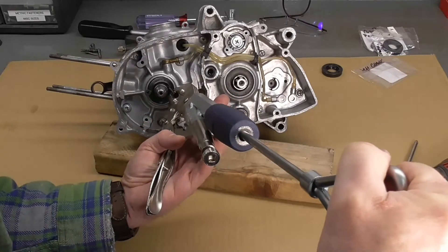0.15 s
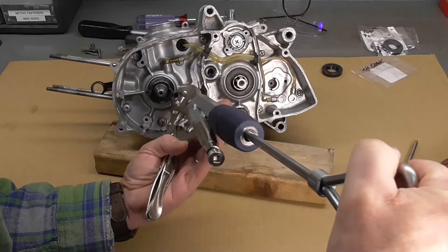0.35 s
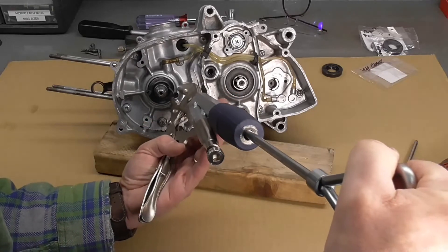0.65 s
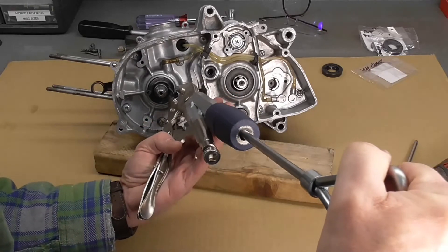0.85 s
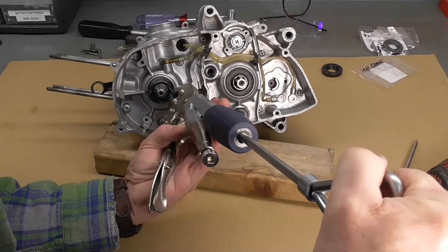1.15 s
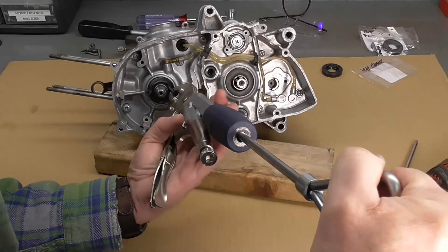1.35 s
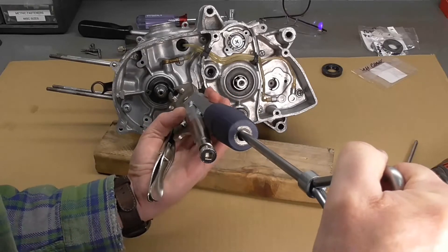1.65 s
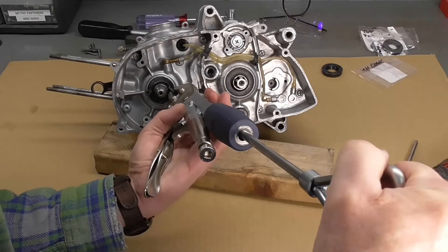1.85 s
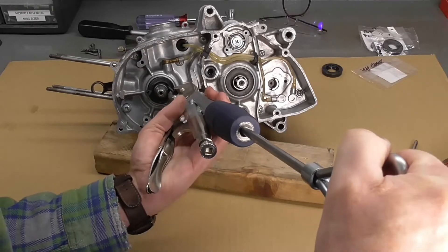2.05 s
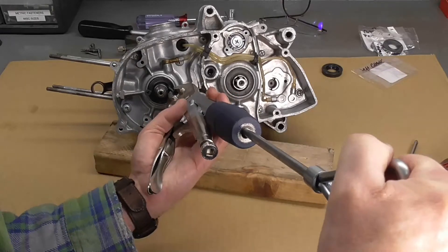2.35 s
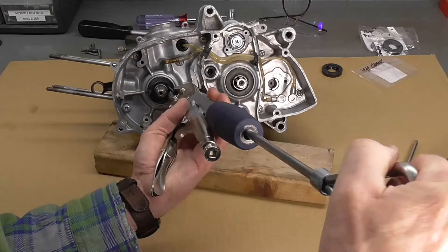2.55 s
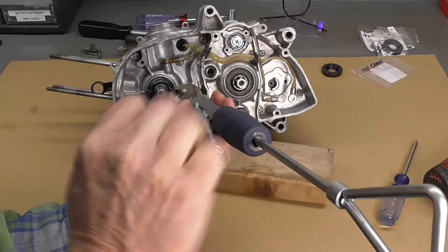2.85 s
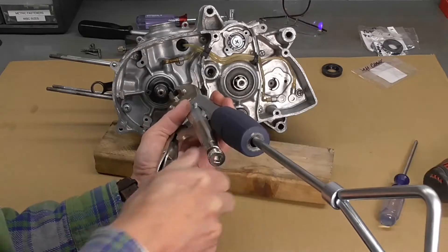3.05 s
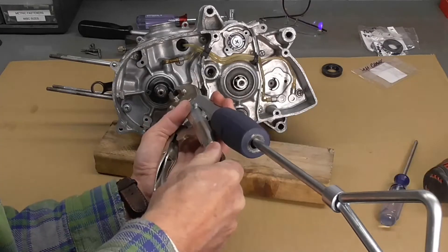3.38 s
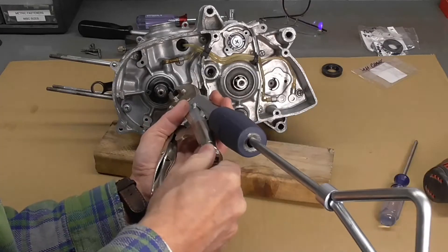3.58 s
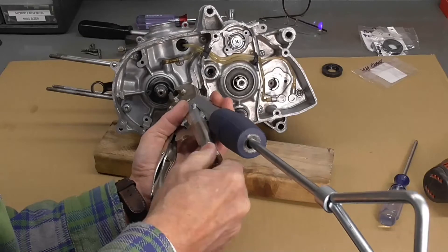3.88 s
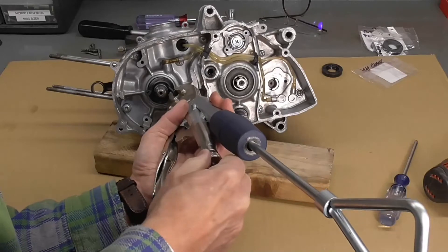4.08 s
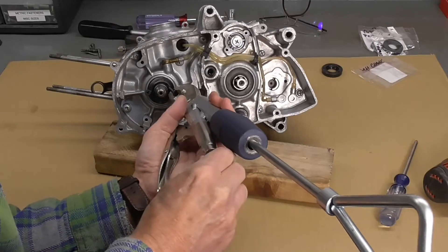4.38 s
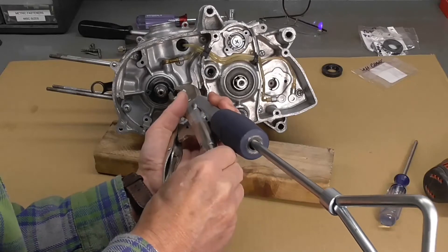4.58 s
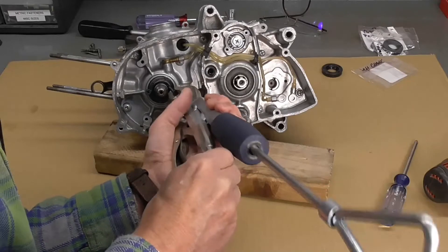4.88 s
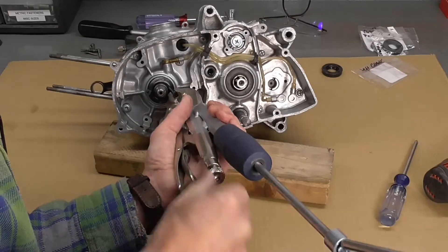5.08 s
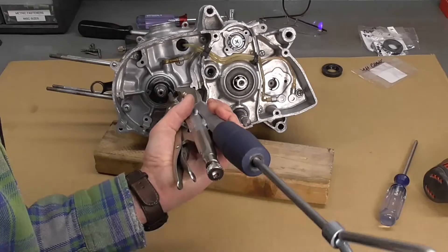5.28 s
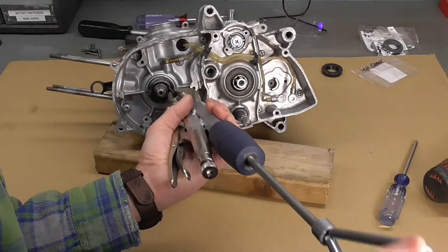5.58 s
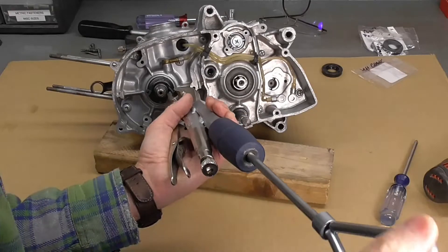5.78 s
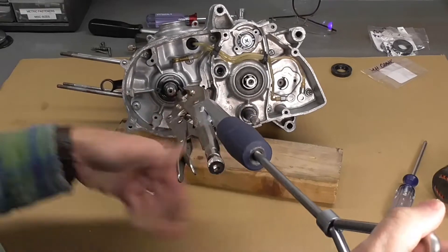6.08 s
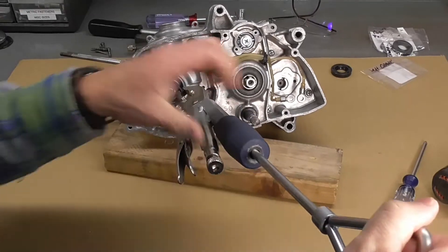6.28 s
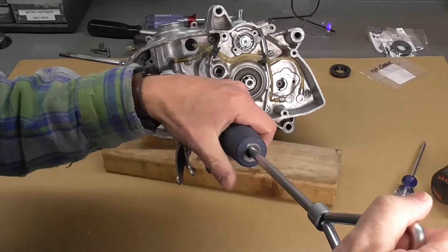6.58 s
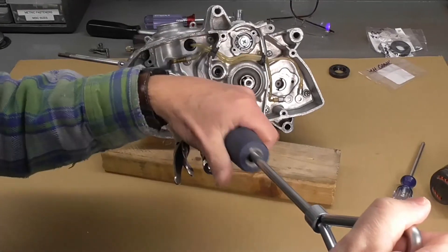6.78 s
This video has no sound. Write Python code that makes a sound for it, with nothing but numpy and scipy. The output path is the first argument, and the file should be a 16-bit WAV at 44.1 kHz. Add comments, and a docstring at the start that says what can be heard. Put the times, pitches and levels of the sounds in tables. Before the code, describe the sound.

Light steel clicks and faint hand rustling in a quiet workshop, then locking pliers snap shut with a loud ringing crack and a metal weight scrapes.

```python
"""Pliers on an engine seal

In a small workshop, locking pliers on a slide hammer are set on a seal in an engine case on a bench.
Loose steel parts click, hands brush about, the pliers snap shut and the weight starts to scrape on its rod.
Steel is fading sine waves set off by bursts of noise; brushing, rumble and hiss are filtered noise; the
machine hum is wavering sine waves. Echoes and fading noise tails make the room."""
import sys
import numpy as np
from scipy import signal
from scipy.fft import rfft, irfft, next_fast_len
from scipy.io import wavfile

SR = 44100
rng = np.random.default_rng(int(sys.argv[2]) if len(sys.argv) > 2 else 0)


def waveform_to_disk(signal):
    """Save audio, clipped to [-1, 1], as 16-bit WAV at the path in sys.argv[1]."""
    frames = np.transpose(np.atleast_2d(signal))
    scaled = np.clip(frames, -1, 1) * 32767
    samples = np.round(scaled).astype(np.int16)
    wavfile.write(sys.argv[1], SR, samples)


N = 305461


def undb(db):
    """Turn decibels into a plain gain."""
    return 10 ** (np.asarray(db) / 20)


def unit(x):
    """Scale a sound to an average (RMS) strength of 1."""
    return x / np.sqrt(np.mean(x ** 2))


def peak(x, db):
    """Scale a sound so that its highest point stands at the given dB."""
    return x * undb(db) / np.abs(x).max()


def on_hz(table, n):
    """Read a table of (Hz, value) at the bins of an n-point transform, in even steps of pitch."""
    hz, value = np.transpose(table)
    bin_hz = np.arange(n // 2 + 1) * SR / n
    return np.interp(np.log(bin_hz + 1), np.log(hz), value)


def colour(x, table):
    """Raise or lower each pitch range by a table of (Hz, dB)."""
    n = x.shape[-1]
    return irfft(rfft(x) * undb(on_hz(table, n)), n)


def band(x, lo_hz, hi_hz, order=2):
    """Keep mainly what lies between two pitches."""
    edges = [lo_hz, min(hi_hz, .45 * SR)]
    return signal.sosfilt(signal.butter(order, edges, "band", fs=SR, output="sos"), x)


def fade(t60, t):
    """Die away evenly in dB, by 60 dB in t60 seconds."""
    return np.exp(-np.log(1000) * t / t60)


def ring(modes, push, scatter_db, seconds, spread=0., count=1):
    """Fading sines, weighted anew for every blow and driven by the contact force.
    A jointed part rings in clusters: count close neighbours around each mode."""
    t = np.arange(int(seconds * SR)) / SR
    hz, db, t60 = np.repeat(modes, count, axis=0).T[:, :, None]
    chance = rng.standard_normal((len(hz), 2))
    hz = hz * (1 + spread * chance[:, :1])
    db = db + scatter_db * chance[:, 1:]
    sines = undb(db) * np.sin(2 * np.pi * hz * t) * fade(t60, t)
    return signal.fftconvolve(sines.sum(0), push)[:len(t)]


def chatter(ms, seconds, rise=.12, grain_db=1.0):
    """A contact that bounces many times within a few ms, then lets go; rise is a share of ms."""
    t = np.arange(int(seconds * SR)) * 1000 / SR / max(ms, .3)  # time counted in lengths of the contact
    shape = np.minimum(t / rise, 1) * np.exp(-t ** 1.7)
    grain = undb(grain_db * rng.exponential(size=len(t)))
    return rng.standard_normal(len(t)) * grain * shape


def add(out, x, s, pan_db=0.):
    """Lay a sound into the stereo track at s seconds; pan_db is left minus right."""
    i = int(s * SR)
    x = x[:N - i]
    out[:, i:i + len(x)] += x * undb(np.array([[pan_db], [-pan_db]]) / 2)


def wash(x, table, unlike, span):
    """Noise tails, one for each band of the table; they build up over 2 ms, then fade.
    Each band reaches from its middle pitch divided by span to its middle pitch times span."""
    t = np.arange(int(.5 * SR)) / SR
    noise = rng.standard_normal((3, len(t)))
    noise = noise[0] + unlike * noise[1:]  # a shared part, plus one of its own for each side
    tail = 0
    for hz, t60, db in table:
        tail = tail + undb(db) * band(noise, hz / span, hz * span, order=1) * fade(t60, t)
    tail = tail * np.minimum(t / 0.002, 1)
    return signal.fftconvolve(x.mean(0)[None], tail, axes=1)[:, :N]


def air():
    """Room rumble and microphone hiss from coloured noise, with wavering hum lines from a machine."""
    # Colour of the low rumble. Each row: pitch in Hz, relative level in dB per Hz.
    rumble_colour = [(44, -43), (75, -12), (228, -6.5), (301, -9.5), (335, 2), (403, -16), (485, -7.5),
                     (566, -12.5), (593, -10.5), (748, -15), (859, -13.5), (943, -18), (1340, -19.5),
                     (3000, -42), (3900, -63), (6600, -120)]
    # Colour of the hiss. Each row: pitch in Hz, relative level in dB per Hz.
    hiss_colour = [(1290, -24.5), (2200, -2.5), (2510, -5.5), (3420, -5.5), (3930, -4.5), (4920, -5.5),
                   (5350, -11), (6470, -13), (7390, -7), (10300, -6), (16000, -16.5)]
    rumble_db, hiss_db = -62.5, -77.5  # whole level of each, before the left-right balance
    # How alike the two sides of rumble and hiss are. Each row: pitch in Hz, correlation (1 is the same).
    alike_table = [(60, 0.76), (300, 0.78), (700, 0.19), (1500, 0.36), (6000, 0.14)]
    # Left-right balance. Each row: pitch in Hz, left minus right in dB.
    balance_table = [(60, 2), (110, -4), (200, 1.5), (380, -5), (700, -7.5), (1290, -2.5), (2380, -2.5),
                     (4400, 0), (8120, -1), (15000, -3)]
    # Machine hum lines. Each row: pitch in Hz, level in dB before the balance, width in Hz.
    hum_lines = [(42.18, -75, .1), (48.4, -81.5, 0.11), (125, -76, 3.8), (219.4, -78.5, 14),
                 (352, -76.5, 23), (432, -76, 6.5), (479, -69, 0.48), (534, -84, 5), (604, -77, 5.9),
                 (869, -77, 33)]

    n = next_fast_len(N)
    alike = np.clip(on_hz(alike_table, n), 0, 1)
    sign = np.array([[1], [-1]])  # left, right
    out = 0
    for table, db in (rumble_colour, rumble_db), (hiss_colour, hiss_db):
        mid, side = rfft(rng.standard_normal((2, n)))
        pair = np.sqrt(1 + alike) * mid + sign * np.sqrt(1 - alike) * side
        out = out + unit(irfft(pair * undb(on_hz(table, n)), n)) * undb(db)
    t = np.arange(n) / SR
    for hz, db, width_hz in hum_lines:
        # the phase drifts at random, which spreads the line over its width
        drift = np.cumsum(rng.standard_normal(n)) * np.sqrt(2 * np.pi * width_hz / SR)
        out += np.sqrt(2) * undb(db) * np.sin(2 * np.pi * hz * t + drift)
    balance = undb(sign * on_hz(balance_table, n) / 2)
    return irfft(rfft(out) * balance, n)[:, :N]


def rustle():
    """Skin and cloth: soft grainy noise, partly different on the two sides; fingers tick on a screw."""
    # Hands and sleeves brush past. Each row: middle in seconds, length in seconds,
    # level of the lower part (2.5-4.76 kHz) in dB, level of the upper part (8.1-12.3 kHz) in dB.
    brushes = [(0.432, .07, -77.5, -73), (.725, 0.063, -74, -94), (2.594, 0.18, -80, -80),
               (2.722, 0.16, -75, -79.5), (2.812, 0.17, -78.5, -75.5), (2.948, 0.13, -80, -76.5),
               (3.07, 0.24, -81, -81.5), (3.781, 0.33, -82.5, -101), (3.985, 0.084, -78, -79),
               (4.1, .12, -86, -94), (4.72, .1, -75.5, -93.5), (5.563, 0.095, -94, -73.5),
               (5.725, 0.12, -74, -73), (5.8, .1, -83, -84), (6.094, 0.13, -75.5, -69.5),
               (6.37, 0.23, -81, -90), (6.492, 0.066, -78, -72.5), (6.569, .04, -75.5, -85)]
    # Fingers on the adjusting screw: start in seconds, stop in seconds, ticks per second,
    # middle tick height in dB before filtering.
    screw_ticks = (2.75, 4.45, 22, -43)

    grain = rng.standard_normal((3, N)) * undb(1.8 * rng.exponential(size=N))
    grain = grain[0] + 0.48 * grain[1:]
    t = np.arange(N) / SR
    start, stop, rate, tick_db = screw_ticks
    happens = (rng.random(N) < rate / SR) * (t > start) * (t < stop)
    ticks = happens * undb(tick_db + 1.9 * rng.standard_normal(N))
    low, high = np.zeros((2, N))
    for s, length, low_db, high_db in brushes:
        swell = np.cos(np.pi * np.clip((t - s) / length, -.5, .5)) ** 2
        low = low + undb(low_db) * swell
        high = high + undb(high_db) * swell
    lower = unit(band(grain, 2500, 4760)) * low
    upper = unit(band(grain, 8100, 12300)) * high
    return lower + upper + band(ticks, 3590, 4420)


def clicks():
    """Light steel clicks: each is a short chatter, the ring of the small parts and one mode of its own."""
    # Each row: start in seconds, peak of the middle part in dB, treble part in dB against that,
    # pitch of its own ring in Hz, own ring in dB against the middle part, chatter length in ms.
    click_list = [(1.005, -60.5, 6, 8800, 3, 2.7), (1.0894, -28.5, 0, 11100, -8, 3.7),
                  (1.107, -23, 5, 12310, 3, 8.3), (1.1704, -26, 4.5, 4910, -7, 2.7),
                  (1.1906, -30, 6, 13000, -13, 7.8), (1.3225, -28, 2, 9930, -3, 3.3),
                  (1.374, -42.5, -3, 5130, -8, 5.1), (1.3834, -42, -10, 10060, -1, 2.1),
                  (1.4010, -47, -0.5, 6280, -4.5, 3), (1.6984, -64, -4, 4030, 1, 2.9),
                  (1.799, -51.5, -16, 4000, 1.5, 1.6), (1.8994, -53.5, 8.5, 12900, 10.5, 4),
                  (2.1031, -64, -13.5, 4060, 2.5, 3), (2.1548, -64, 4, 11880, -11, 3.5),
                  (2.373, -59, -11, 3620, 9, 4.6), (2.4297, -56, 2, 12300, -8, 3.5),
                  (2.534, -64, 0, 9050, -7, 3.7), (2.5645, -65, 2, 2800, 5, 5.7),
                  (2.723, -63.5, -19, 4220, 5.5, 2.8), (2.9596, -67.5, -10, 3410, 0, 3.3),
                  (3.8872, -71, -9, 2760, 12, 5.3), (4.3065, -60.5, 2, 5400, 0, 3.3),
                  (4.3391, -50, 8, 10000, 9.5, 2.2), (4.364, -58, 3, 5400, -0.5, 3.3),
                  (5.3993, -68, 6, 9100, 1, 3.3), (6.1365, -49, -0.5, 3548, -5, 2.5)]
    # Ring of the small parts. Each row: pitch in Hz, relative level in dB, 60 dB fade in seconds.
    part_modes = [(3800, -7, .01), (4600, -3, .015), (5600, -3, .012), (6600, -2, .015), (7300, -5, .01),
                  (8600, -7, .01), (9800, -3, .016), (11500, -3, .01), (12200, 0, .02), (13300, -3, .012)]
    own_t60_s = .012
    base_low_db, low_per_db = -20, -0.1852  # low part of a -55.5 dB click; harder clicks hold less of it
    pan_at_4k_db, pan_db_per_octave = -.5, -2  # left minus right; higher rings lean right

    out = np.zeros((2, N))
    for s, db, high_db, hz, ring_db, ms in click_list:
        push = chatter(ms, .15, rise=0.033)
        small_parts = ring(part_modes, push, 3, .15, spread=.03, count=3)
        body = peak(push, 0) + peak(small_parts, -6)
        low = peak(band(body, 1700, 3000), base_low_db + low_per_db * (db + 55.5))
        middle = peak(band(body, 3900, 8800, order=3), 0)
        treble = peak(band(body, 7300, 14000), high_db)
        own = peak(ring([(hz, 0, own_t60_s)], push, 3, .15, spread=0.011, count=3), ring_db)
        pan_db = pan_at_4k_db + pan_db_per_octave * np.log2(hz / 4000)
        add(out, undb(db) * (low + middle + treble + own), s, pan_db)
    return out


def shop(x):
    """Close echoes off bench and case, unlike left and right, then the fading noise of the room."""
    # Room tails. Each row: middle pitch in Hz, 60 dB fade in seconds, noise level in dB before filtering.
    room_tails = [(1000, .33, -47), (2100, .33, -51), (4600, .27, -49), (6500, .2, -51), (9300, .14, -53),
                  (13000, .1, -53)]

    t = np.arange(int(0.013 * SR)) / SR
    noise = band(rng.standard_normal((2, len(t))), 2500, 16000, order=1)
    echoes = undb(-28) * noise * fade(0.02, t)
    close = signal.fftconvolve(x.mean(0)[None], echoes, axes=1)[:, :N]
    return close + wash(x, room_tails, .9, 1.5)


def bench():
    """Soft knocks through bench and tool: one fading mode each; the bench is too small for deep bass."""
    # Each row: start in seconds, peak in dB before filtering, pitch in Hz, 60 dB fade in seconds.
    thuds = [(1.17, -49.5, 263, 0.13), (1.665, -57.5, 1200, 0.03), (2.372, -62.5, 1650, 0.037),
             (2.562, -47, 194, 0.19), (2.563, -68, 2820, 0.25), (2.564, -67, 10550, .15),
             (2.566, -74, 3890, 0.13), (2.59, -44, 230, 0.11), (2.595, -59.5, 1170, 0.097),
             (2.615, -49, 307, .1), (4.929, -34.5, 330, 0.046), (4.93, -33, 180, 0.029),
             (4.943, -44.5, 237, 0.15), (4.95, -41.5, 92, 0.11), (4.988, -43, 98, 0.13)]

    out = np.zeros((2, N))
    for s, db, hz, t60 in thuds:
        push = np.hanning(int(SR / hz / 2) + 2)  # a soft push lasting about half a swing
        add(out, peak(ring([(hz, 0, t60)], push, 0, .4), db), s, -1.5)
    return band(out, 65, 14000)


def pliers():
    """The jaws lock with a crack, the handles rebound, the steel rings and the case answers each crack."""
    # The jaws lock, then the handles rebound and rattle.
    # Each row: start in seconds, crack peak in dB before brightening, chatter length in ms.
    snaps = [(4.9315, -2, 1.8), (4.936, -22, 10.5), (4.949, -22, 15), (4.967, -23, 27), (5.025, -36, 53),
             (5.089, -50.5, 68)]
    # Colour of the crack. Each row: pitch in Hz, relative level in dB per Hz.
    snap_colour = [(180, -46.5), (300, -8), (749, -42), (1190, -12), (1640, -17), (2140, -13), (2980, -18),
                   (4370, 2.5), (6300, -13.5), (7820, -12), (9390, -1), (10600, -2.5), (13500, -15),
                   (15000, -12), (16000, -23.5)]
    # Ring of the pliers. Each row: pitch in Hz, relative level in dB, 60 dB fade in seconds.
    plier_modes = [(1190, -19, .06), (1567, -15.5, 0.26), (1690, -15.5, 0.11), (2160, -9.5, 0.06),
                   (2200, -10, 0.07), (3020, 1.5, 0.0057), (3861, -8, 0.045), (4120, -10, 0.072),
                   (4550, 0, 0.078), (5185, -5, 0.047), (7222, -7.5, 0.042), (8740, -14.5, .035),
                   (8700, -10.5, 0.042), (11460, 1.5, 0.028), (10700, -7, .03)]
    # The rod sings on. Each row: pitch in Hz, level in dB, 60 dB fade in seconds.
    long_ring = [(4500, -61, 1.3), (4605, -64.5, .9), (4440, -52.5, .4), (4200, -53, 0.44),
                 (2024, -49.5, .55), (2040, -51, .55), (2093, -48.5, .6), (2140, -47.5, .65)]
    # The engine case has modes too dense to count, so it answers with noise.
    # Each row: middle pitch in Hz, 60 dB fade in seconds, noise level in dB before filtering.
    case_tails = [(706, 0.41, -35.5), (1352, 0.19, -38), (2096, 0.35, -38.5), (3240, 0.17, -42),
                  (4650, 0.2, -43), (6600, 0.19, -36.5), (9200, 0.12, -43), (12200, 0.15, -44.5)]
    base_bright_db, bright_per_db = 4, 0.7  # treble boost at 0 dB; softer blows are duller
    base_ring_db, ring_per_db = -15, -0.38  # ring against crack at 0 dB; softer blows hold more ring

    steel_layer, crack_layer = np.zeros((2, 2, N))
    impulse = np.zeros(256)
    impulse[128] = 1
    response = colour(impulse, snap_colour)
    for s, db, ms in snaps:
        push = chatter(ms, .3, rise=0.22)
        crack = peak(signal.fftconvolve(push, response, "same"), db)
        steel = ring(plier_modes, push, 3, .3, spread=.02, count=3)
        steel = peak(steel, db + base_ring_db + ring_per_db * db)
        bright = undb(base_bright_db + bright_per_db * db)
        for layer, sound in (crack_layer, crack), (steel_layer, steel):
            add(layer, sound + (bright - 1) * band(sound, 6500, 16000), s, -2.5)
    add(steel_layer, ring(long_ring, np.ones(1), 0, 1.8), snaps[0][0], -1.0)
    return steel_layer + crack_layer + wash(crack_layer, case_tails, 0.96, 1.31)


def scrape():
    """The weight jerks along the rod: each jerk drags grit through the resonances of weight and rod."""
    # Each row: start in seconds, peak in dB.
    jerks = [(6.834, -47), (6.844, -38.5), (6.858, -43), (6.869, -37.5), (6.88, -30.5), (6.893, -25.5),
             (6.902, -26.5), (6.913, -15)]
    # Ring of weight and rod. Each row: pitch in Hz, relative level in dB, 60 dB fade in seconds.
    rod_modes = [(1486, 0, 0.07), (1876, -2, 0.11), (2270, -10.5, 0.039), (3020, 5, 0.051),
                 (3600, -13, .03), (4160, 8, 0.021), (4500, 5.5, 0.03), (5070, -3, 0.029), (6850, -1, .03),
                 (9100, 2, 0.028), (9250, -1, 0.032), (10340, -1, 0.033)]
    jerk_ms = 15.7
    first_tilt_db, tilt_db_per_s = -9.5, 186  # rough tilt per octave at the first jerk; later ones are brighter

    out = np.zeros((2, N))
    for s, db in jerks:
        push = chatter(jerk_ms, .12, rise=0.2)
        low_grit = peak(band(push, 1380, 5100, order=3), -7)
        high_grit = peak(band(push, 8400, 12000, order=3), -19)
        steel = peak(ring(rod_modes, push, 3, .12, spread=.02, count=3), 0)
        rub = band(steel + low_grit + high_grit, 1300, 15000, order=3)
        tilt_db = first_tilt_db + tilt_db_per_s * (s - jerks[0][0])
        tilt = [(1000, -2 * tilt_db), (4000, 0), (16000, 2 * tilt_db - 4)]  # (Hz, dB)
        add(out, peak(colour(rub, tilt), db), s, -1.0)
    return out


def scene():
    """Steel and bench sounds with their echoes, then the brushing hands and the air of the room."""
    near = clicks() + pliers() + bench() + scrape()
    return near + shop(near) + rustle() + air()


def record(dry):
    """Cut the deep bass gently below 36 Hz and the top steeply above 15750 Hz."""
    dry = signal.sosfilt(signal.butter(2, 36, "high", fs=SR, output="sos"), dry)
    return signal.sosfilt(signal.ellip(12, .2, 90, 15750, fs=SR, output="sos"), dry)


dry = scene()
out = record(dry)
waveform_to_disk(out)
```